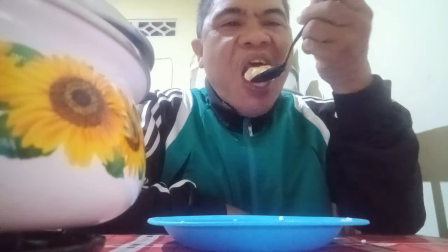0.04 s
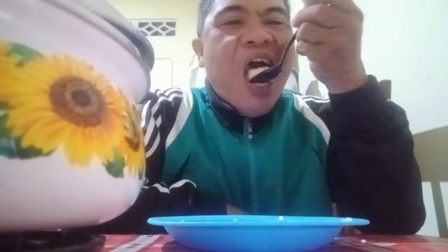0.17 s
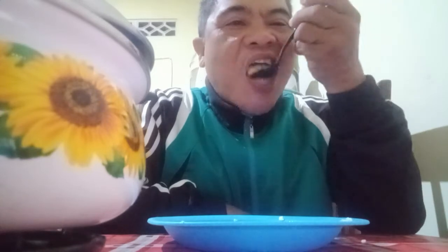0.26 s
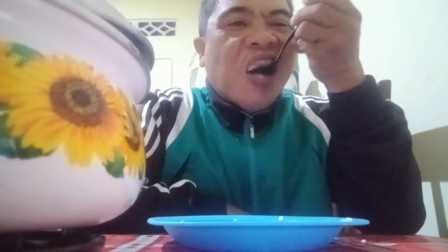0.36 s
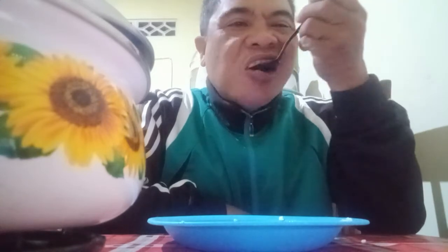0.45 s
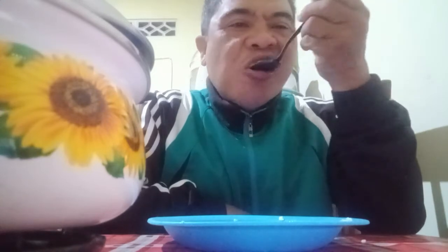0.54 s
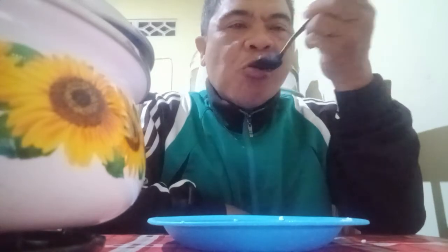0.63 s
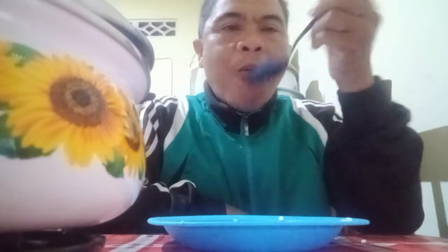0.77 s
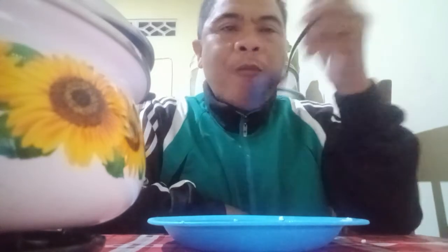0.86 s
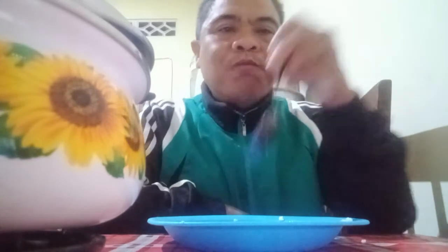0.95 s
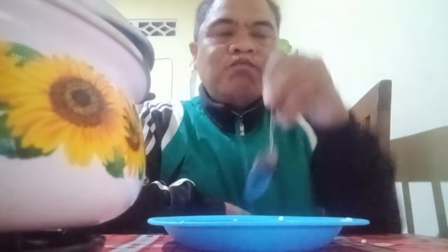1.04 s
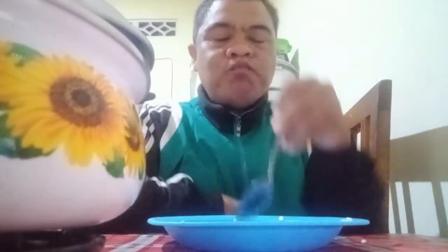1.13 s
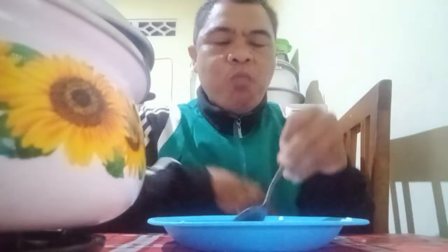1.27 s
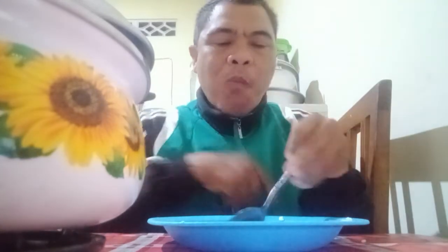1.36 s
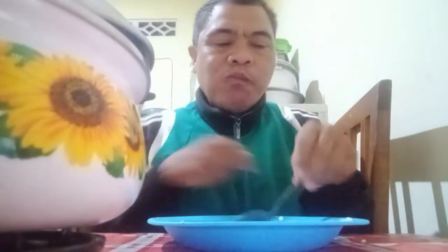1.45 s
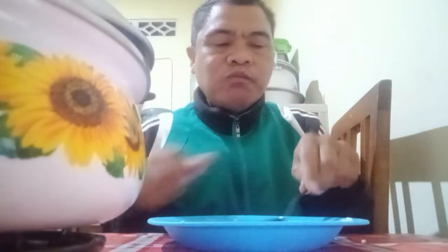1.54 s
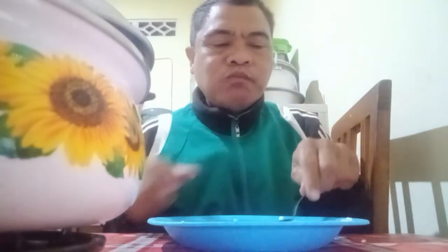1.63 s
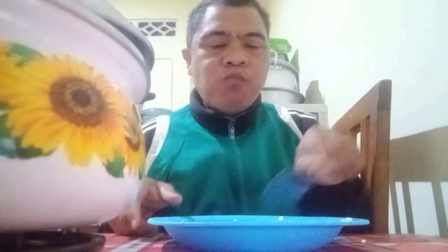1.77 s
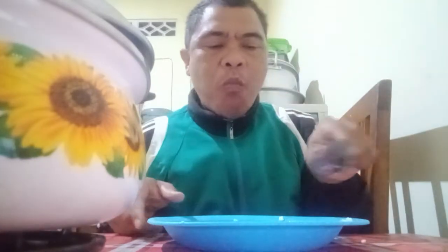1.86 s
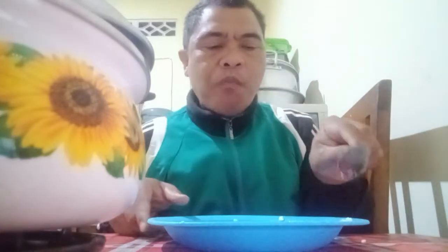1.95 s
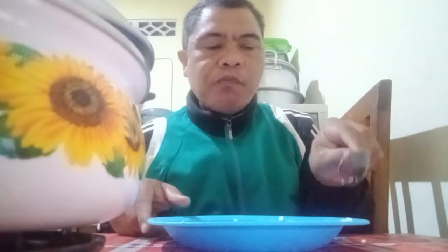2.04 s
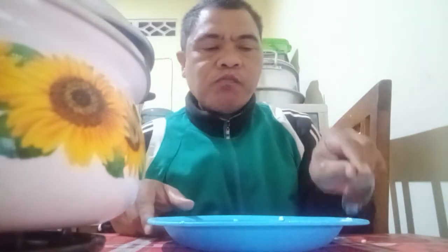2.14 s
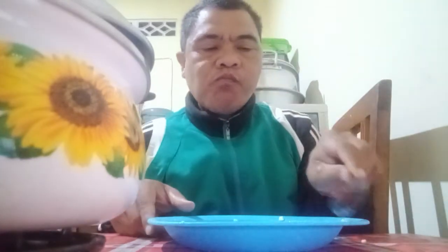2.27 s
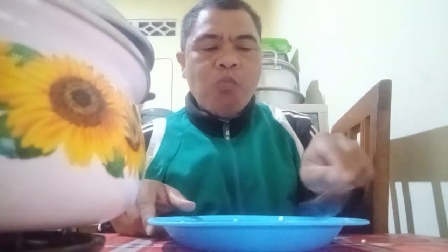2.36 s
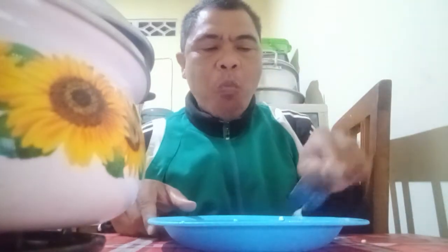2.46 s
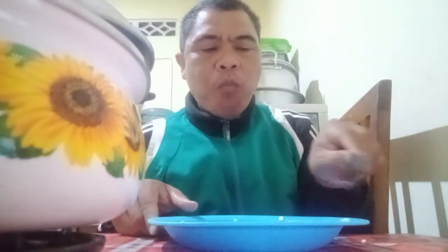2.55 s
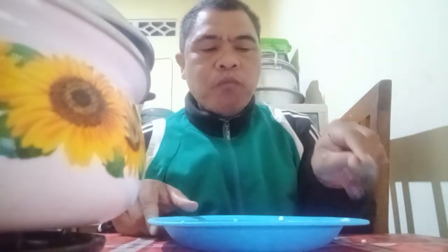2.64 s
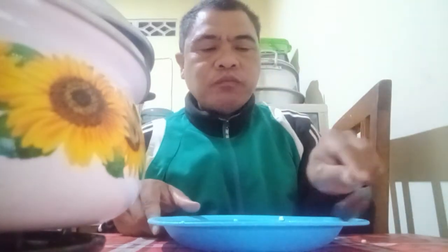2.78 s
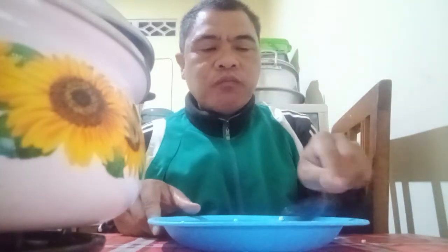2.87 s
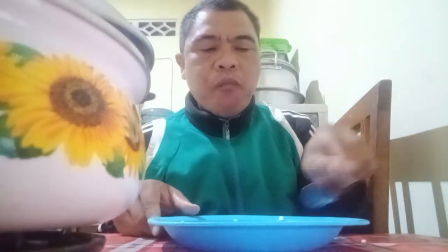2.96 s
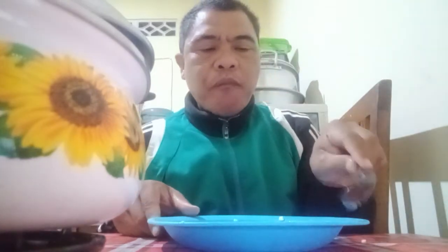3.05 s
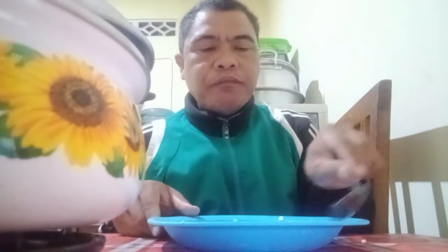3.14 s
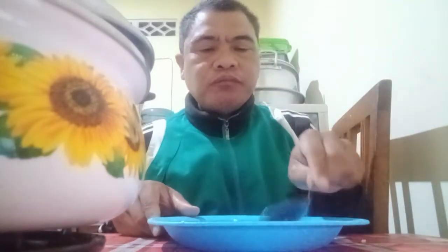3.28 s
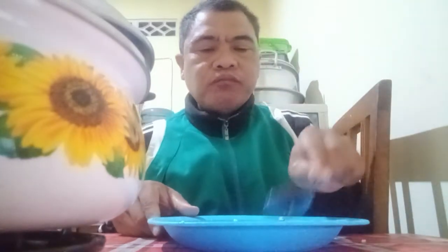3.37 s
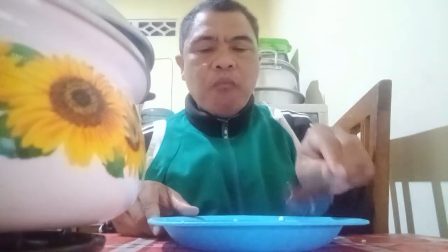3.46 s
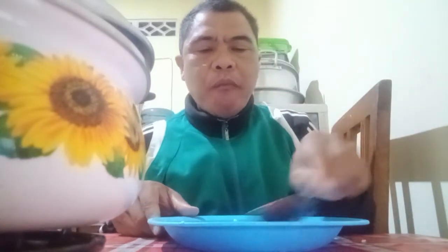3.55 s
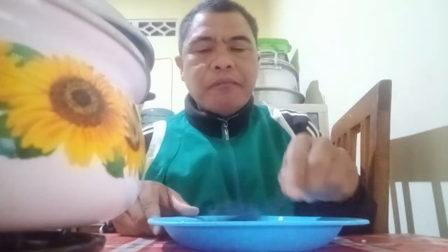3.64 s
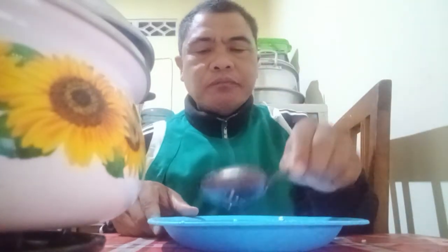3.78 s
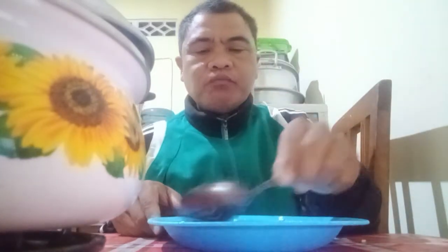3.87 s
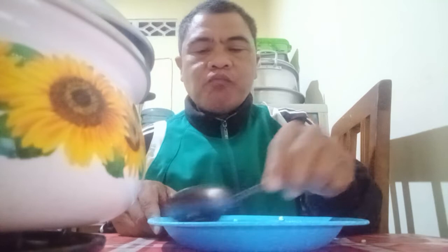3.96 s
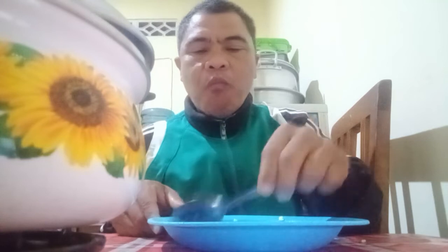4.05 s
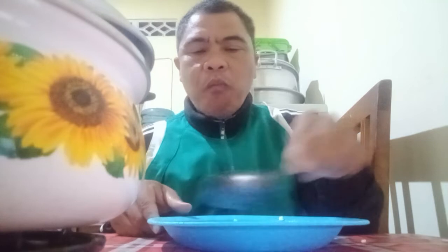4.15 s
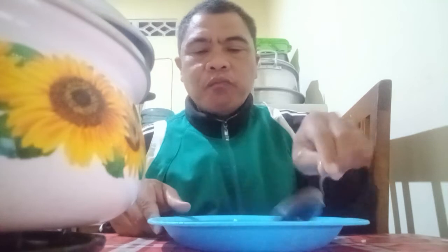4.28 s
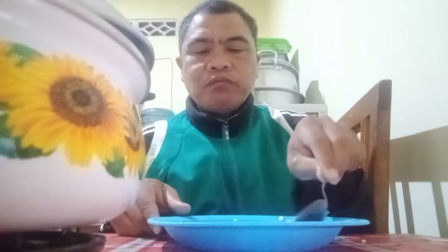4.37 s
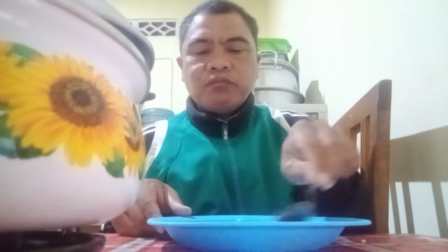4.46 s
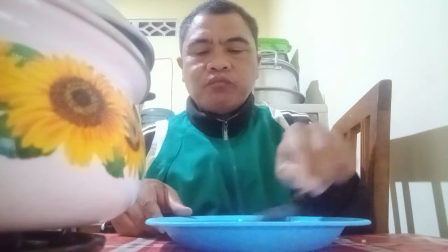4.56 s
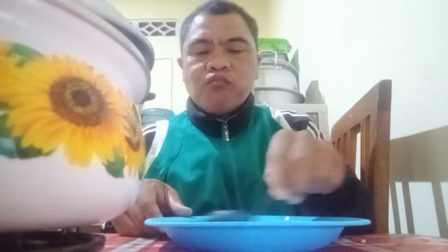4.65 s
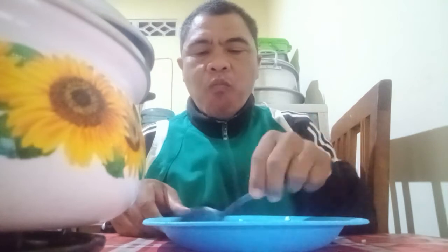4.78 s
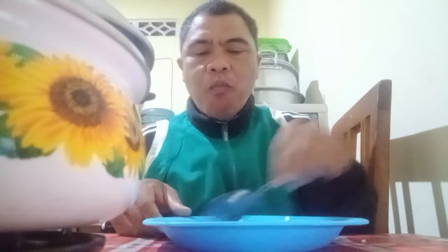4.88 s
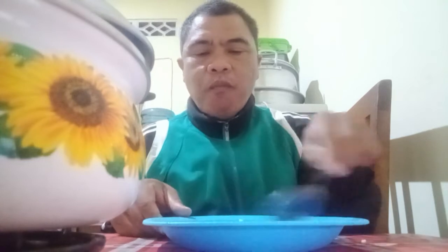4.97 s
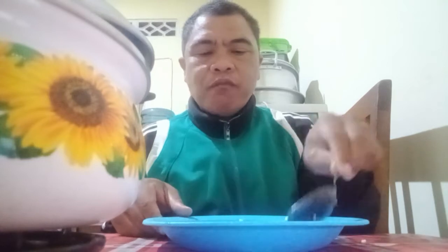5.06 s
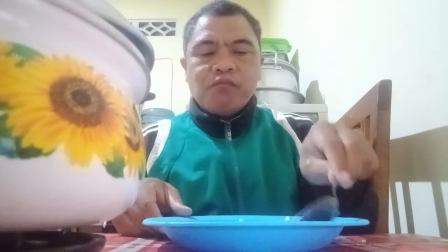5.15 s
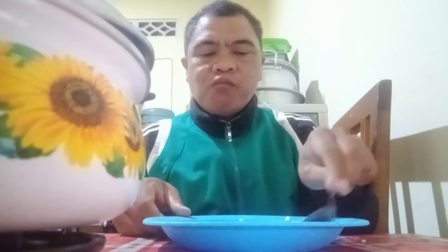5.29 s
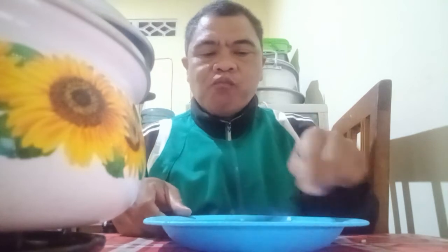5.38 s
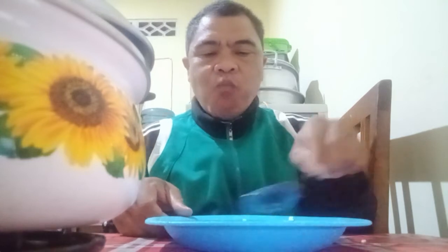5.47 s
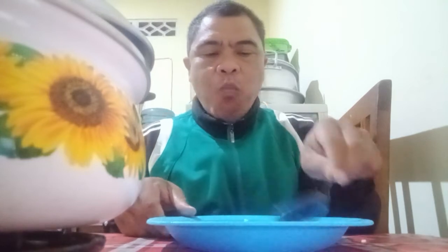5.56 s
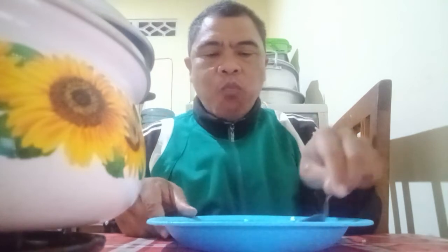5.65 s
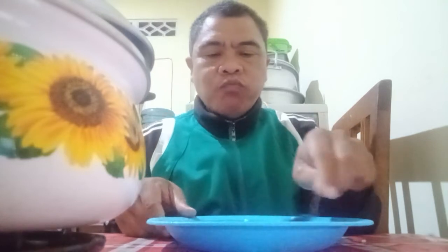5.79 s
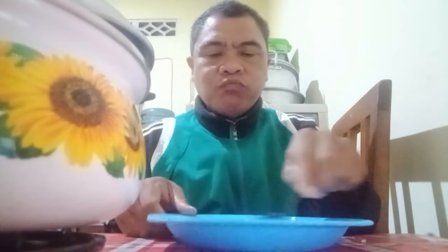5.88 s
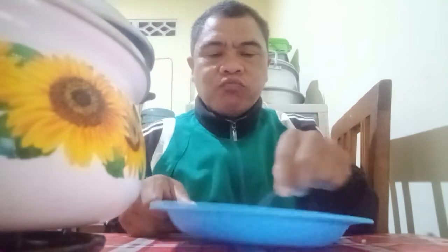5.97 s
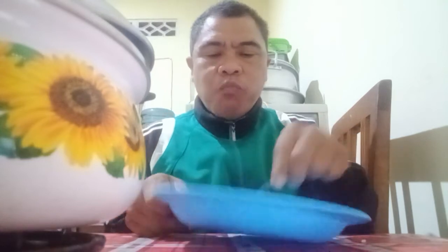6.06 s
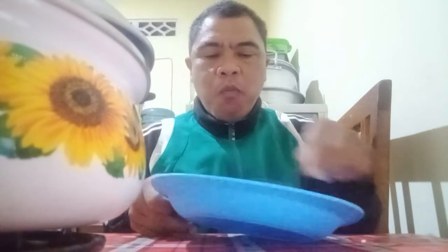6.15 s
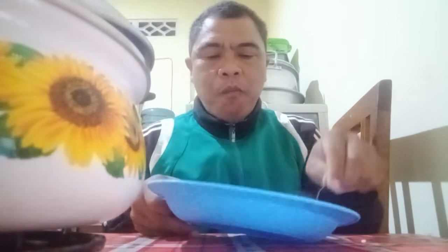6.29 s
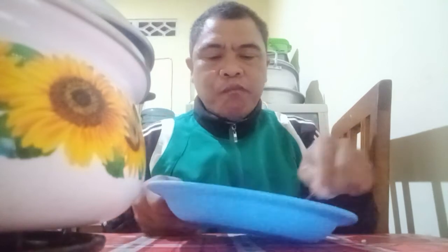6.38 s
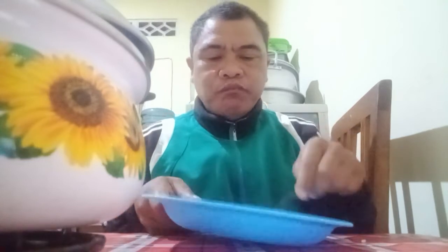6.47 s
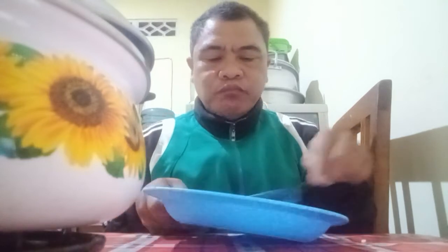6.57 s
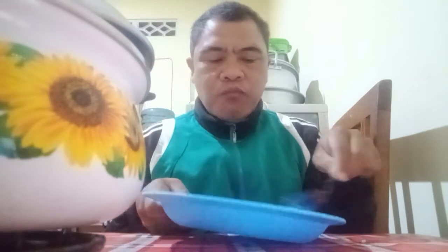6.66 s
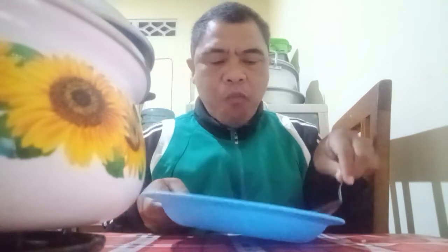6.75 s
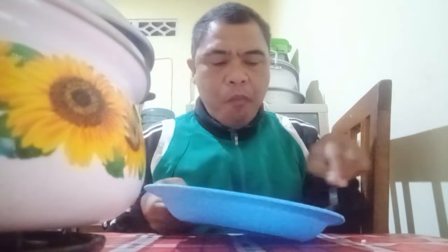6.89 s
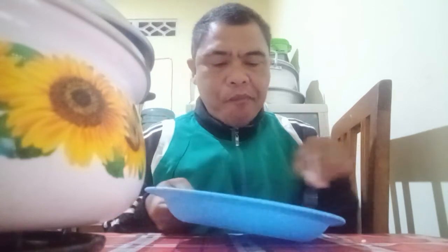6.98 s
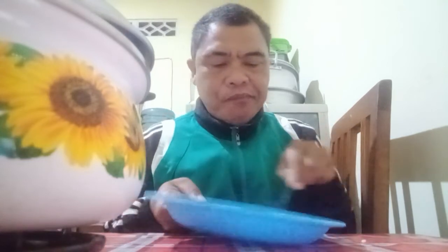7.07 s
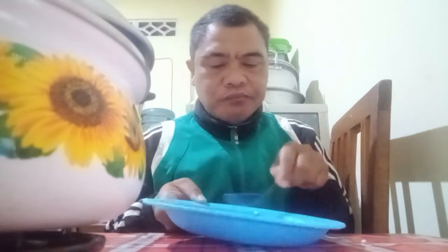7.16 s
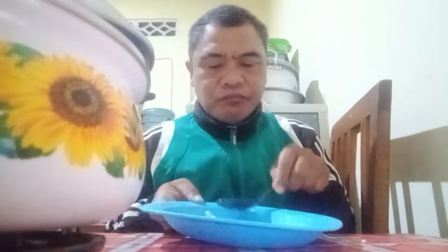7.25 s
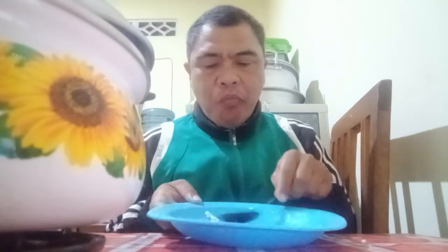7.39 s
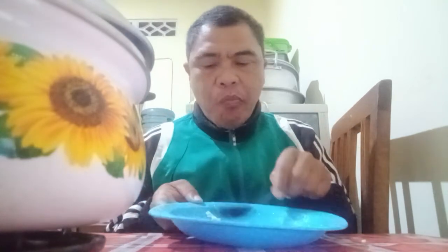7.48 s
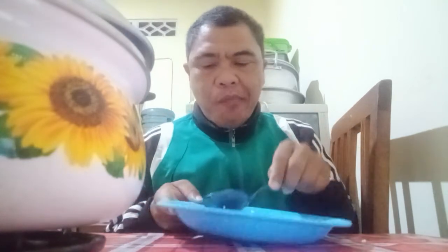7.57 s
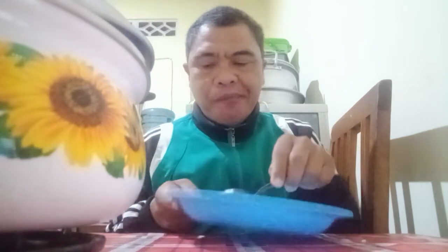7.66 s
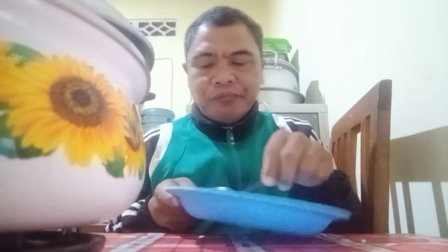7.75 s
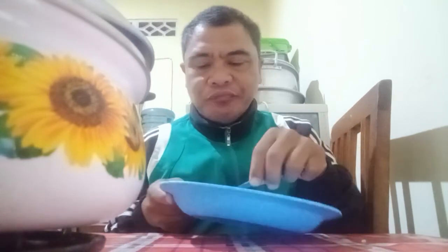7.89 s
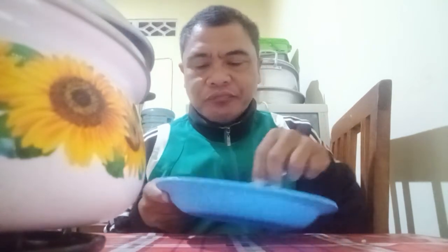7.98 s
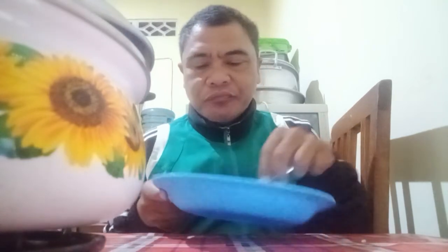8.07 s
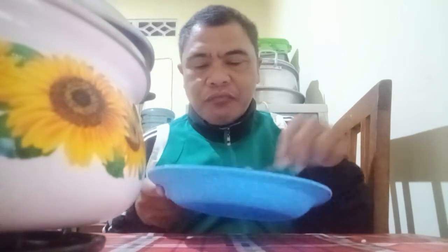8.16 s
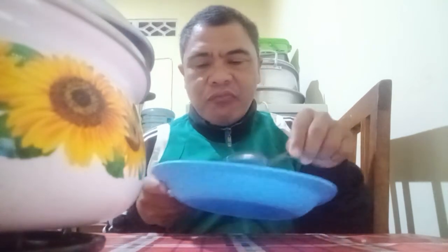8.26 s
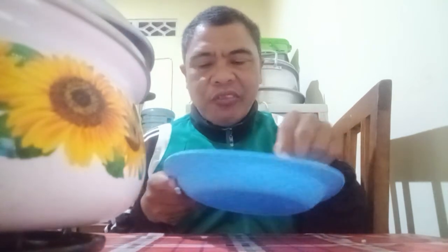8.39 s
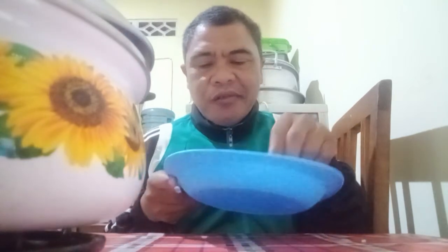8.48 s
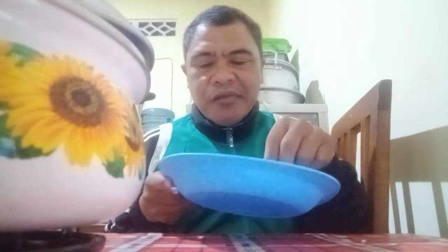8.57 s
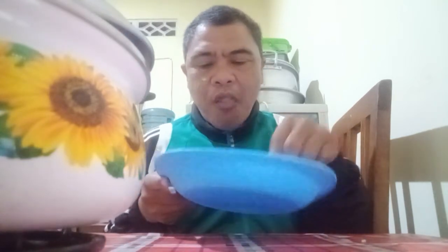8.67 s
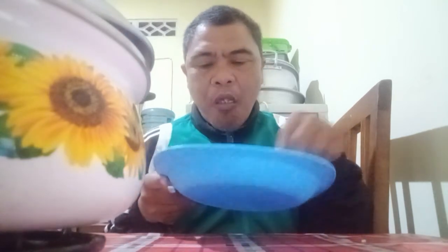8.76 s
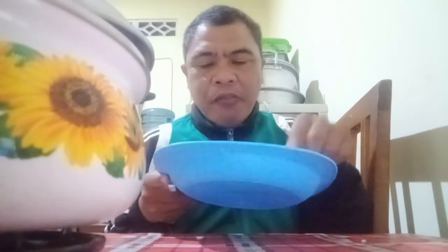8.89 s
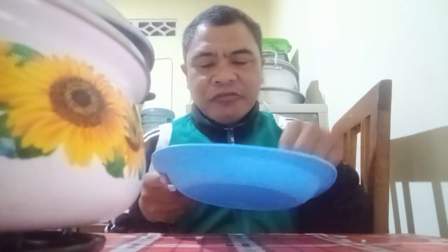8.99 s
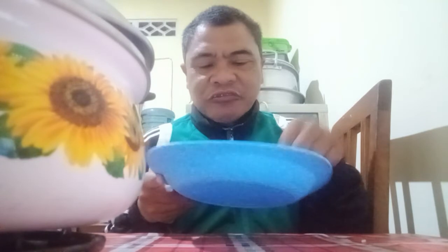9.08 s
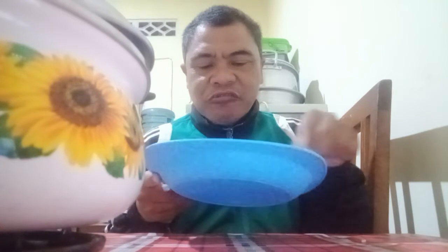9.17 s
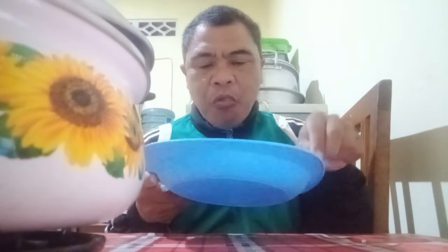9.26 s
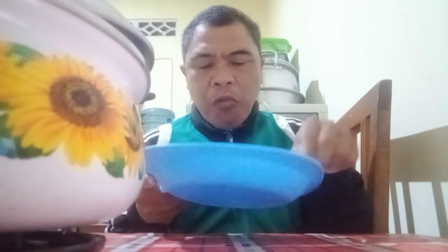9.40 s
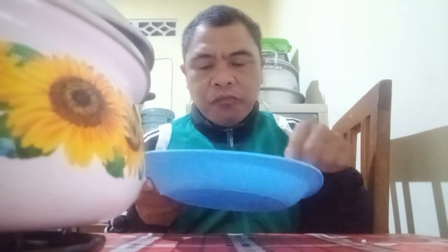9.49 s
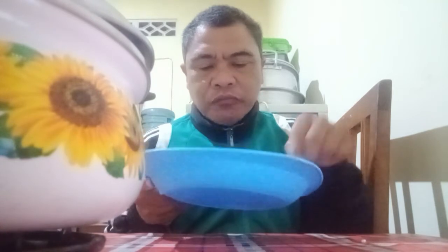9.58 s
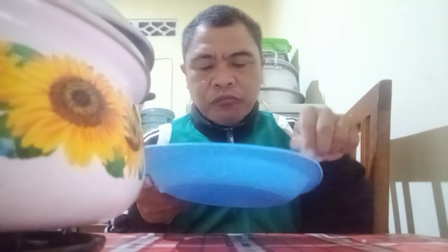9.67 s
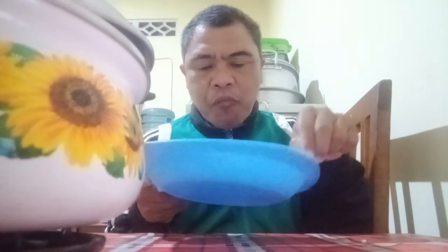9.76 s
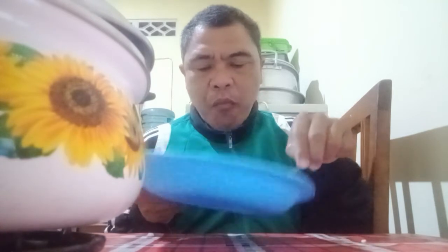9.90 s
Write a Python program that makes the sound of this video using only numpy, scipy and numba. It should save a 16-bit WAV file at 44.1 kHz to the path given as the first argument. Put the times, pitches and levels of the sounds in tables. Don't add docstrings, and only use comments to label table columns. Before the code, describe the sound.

Close by in a small hard-walled room, a metal spoon ticks faintly against teeth, then there is a near-quiet pause with soft bumps. Light taps on a plastic plate follow, growing into short, hollow, gritty scrapes with sharp clacks. The strokes continue in clusters, lower pitched once the plate is lifted, and end softer. Low room hum and thin hiss stay underneath, caught by a phone about an arm's length away.

```python
import sys
import numpy as np
from scipy import signal
from scipy.fft import rfft, irfft
from scipy.io import wavfile
from scipy.ndimage import uniform_filter1d
from numba import njit

SR = 44100
rng = np.random.default_rng(int(sys.argv[2]) if len(sys.argv) > 2 else 0)


def transcribe(u):
    v = np.clip(np.atleast_2d(u).T, -1, 1)
    q = np.round(v * 32767).astype(np.int16)
    wavfile.write(sys.argv[1], SR, q)


def convert_level_to_amplitude(level_db):
    exponent = np.asarray(level_db, float) / 20
    return 10 ** exponent


N = 437913
HOP = 128

# hardest moment in seconds, swell in seconds, let-off in
# seconds, bowl level in dB.
PUSHES = [(1.229, 0.012, 0.12, -36.5), (1.275, 0.1, 0.097, -36.5), (2.814, 0.088, 0.033, -33),
          (3.197, 0.034, 0.044, -28), (3.502, 0.017, 0.14, -36), (3.586, 0.068, 0.16, -28.5),
          (3.908, 0.0046, 0.34, -32.5), (3.969, 0.068, 0.046, -18), (4.001, 0.15, 0.19, -27.5),
          (4.553, 0.11, 0.18, -33), (4.648, 0.17, 0.34, -21.5), (4.77, 0.27, 0.18, -20),
          (4.85, 0.041, 0.19, -32.5), (5.307, 0.0065, 0.1, -31.5), (5.354, 0.064, 0.18, -22),
          (5.679, 0.0088, 0.042, -31), (5.962, 0.098, 0.11, -19), (6.033, 0.21, 0.16, -22),
          (6.38, 0.0093, 0.25, -26), (6.45, 0.064, 0.08, -23.5), (6.901, 0.061, 0.4, -35.5),
                 (6.968, 0.085, 0.17, -27), (7.255, 0.044, 0.34, -32), (7.379, 0.26, 0.076, -30.5),
                 (7.679, 0.018, 0.24, -25.5), (7.82, 0.06, 0.32, -25), (7.966, 0.3, 0.17, -19.5),
                 (8.432, 0.024, 0.2, -42), (8.596, 0.11, 0.1, -20.5), (8.896, 0.0049, 0.27, -39.5),
                 (8.977, 0.049, 0.089, -32), (9.309, 0.014, 0.18, -38.5), (9.371, 0.053, 0.21, -26),
                 (9.449, 0.13, 0.093, -23), (9.763, 0.0036, 0.064, -47), (9.837, 0.11, 0.18, -30),
                 (9.92, 0.018, 0.062, -34.5)]
# favoured ring in Hz, then boom, rim and edge hiss in
# dB relative to the bowl.
PLACES = [(1760, -13, 2, -9), (1208, -29, -22, -8), (1820, -8.5, -16.5, -13.5),
          (1800, -21, -12.5, -16.5), (1820, -18, -2.5, -10.5), (1800, -23, -2, -8),
          (1880, -23, -10, -6.5), (1344, -41, -13, -21), (1540, -20.5, 1.5, -3.5),
          (1800, -15, -30, -4), (1070, -25, -6.5, -3.5), (1663, -12, -8.5, -6), (1720, -54, -6.5, -35),
          (1770, -24, -35, -19), (1530, -23.5, -3.5, -7), (1800, -19, -4, -12),
          (1320, -32, -16.5, -22.5), (1100, -27.5, -14, -20),
          (1133, -13, -9.5, -18), (1130, -16, -5, -10), (1910, -20, -9, -16.5),
                 (1120, -16.5, -6, -11.5), (900, -6.5, -10, -17), (940, -36, -11.5, -10.5),
                 (1020, -22, -15, -14), (1050, -11.5, -11, -8), (1085, -22.5, -12.5, -10.5),
                 (980, -9, -18, -16), (983, -17, -13.5, -14), (1920, 2.5, -17, -23),
                 (1135, -1.5, -8, -16.5), (1000, -10, -21, -7.5), (1075, -4.5, -13.5, -24),
                 (1342, -20, -13, -14.5), (1680, -1, -3.5, -4), (1020, -11, -17.5, -22),
                 (1020, -32, -30, -16)]
SWELL_DB, ROUNDNESS = 31.5, 1.59
BOOM_SHARP, RIM_SHARP, HISS_SHARP = 1.62, 1.62, 1.49

# time in seconds, step in dB, felt for seconds.
CATCHES = [(3.197, 0, 0.018), (3.579, 1.5, 0.014), (3.604, -9.5, 0.047), (3.99, 7, 0.01),
           (4.022, -12.5, 0.057), (4.531, 5.5, 0.036), (4.6, 8, 0.0074), (4.823, -7, 0.11),
           (5.345, 3.5, 0.013), (5.371, -7.5, 0.047), (5.94, -0.5, .02), (6.048, -8, 0.046),
           (6.866, -4, .02), (7.058, -10.5, 0.15), (7.244, 5, .03), (7.803, 7, 0.0096), (7.921, 7, 0.02),
           (8.039, -8, 0.016), (8.082, -15, 0.034), (8.428, -9, 0.022), (8.941, 16, 0.063),
           (9.356, -7, 0.019), (9.815, 2, 0.02), (9.885, 20.5, 0.0071)]
# time in seconds, gain in dB.
SNAGS = [(3.547, 7), (3.568, 4), (3.583, -7), (3.941, 0), (3.973, -1), (4.013, -17), (4.089, 14.5),
         (4.512, -4), (4.531, 8), (4.569, 6), (4.599, 2), (4.74, -15), (4.766, -14), (4.811, 4),
         (4.867, 11.5), (4.905, 1), (5.33, 6), (5.914, -4), (5.957, 0), (6.01, 12), (6.04, -10),
         (6.422, 10), (6.895, 5), (6.929, 18.5), (6.94, 2), (6.97, 0), (7.025, 4), (7.226, 3), (7.29, -3),
         (7.324, 4), (7.362, 2), (7.697, 4), (7.705, -9), (7.736, 7), (7.831, -3), (7.9, -3), (7.96, 1),
         (7.988, 0), (8.005, 11), (8.049, 12), (8.515, 0), (8.524, 11), (8.542, 6), (8.568, 3),
         (8.964, 2.5), (9.355, 5), (9.381, -9), (9.435, -5), (9.449, -5), (9.465, 4), (9.513, 1),
         (9.815, 12.5), (9.885, 4.5), (9.917, 10)]
SNAG_S, SNAG_SHARE = 0.0022, (1, 0.6, 0.35, 0.13)
# time in seconds, bowl peak in dB, rim in dB, edge in dB.
TAPS = [(1.226, -19, 5, 14.5), (2.734, -18, -16, -18), (3.177, -8.5, -14, -11), (3.196, -8, -8, -18),
        (3.5, -2, 6.5, -6), (3.907, -4.5, 2, -1.5), (3.992, -14, -21, -14), (4.389, -22, 13.5, 5.5),
        (5.679, -12.5, -9, 2.5), (6.38, -8.5, -9, -7.5), (6.825, -25.5, -2, -7), (6.866, -32, -14, -10),
        (7.248, -15.5, 22, 8.5), (7.676, 2, 0, -8), (7.802, -7, -6, -11), (7.924, -4, 6, 0),
        (8.428, -22, -12, -14), (8.893, -25, -9, -9), (9.306, -22, 11, 6.5), (9.761, -23, -2, -8)]
CHATTER_S = 0.0008

# time in seconds, finest scratch in dB and
# steel ring in dB (both relative to the edge hiss), favoured rim ring in Hz.
GRIPS = [(0, -13, -16, 2680), (2.5, -8, -13, 2310), (3.0, -9, -12, 2270), (3.4, -10.5, -10.5, 3150),
         (3.8, -9.5, -11.5, 2830), (4.3, -28, -31, 3330), (4.45, -17, -25, 3150), (4.7, -19, -24, 2960),
         (5.2, -13, -8.5, 3560), (5.6, -22, -12, 2590), (5.8, -24, -12, 2480), (6.3, -12, -11, 3050),
         (6.75, -10, -16, 3640), (7.2, -9.5, -14, 3420), (7.6, -14, -15, 3240), (7.78, -19.5, -19, 3350),
         (8.35, -21, -18, 3240), (8.85, -22, -12, 3080), (9.25, -15, -14, 3450), (9.7, -12.5, -18, 2820)]
# boom in Hz, edge in Hz, steel in Hz, second ring in Hz.
FREE = [(840, 5600, 12700, 2960), (890, 5100, 11350, 3000), (875, 5300, 11350, 3240),
        (814, 5200, 11500, 2100), (820, 5400, 13000, 3520), (590, 6200, 12000, 1460),
        (590, 6900, 13000, 3840), (590, 5480, 13300, 3950), (614, 5570, 11000, 2900),
        (600, 5570, 11350, 3240), (580, 5500, 11350, 2920), (624, 5300, 10700, 2320),
        (462, 5320, 11350, 2240), (770, 5600, 11350, 2700), (640, 5100, 12500, 2250),
        (650, 5500, 12000, 3810), (632, 5800, 11350, 2300), (517, 6100, 11350, 2300),
        (576, 4820, 11350, 2530), (600, 5300, 11350, 3240)]
FREE_DB, FREE_SPREAD = (25, 12.3, 11.4, 7.6), (0.12, 0.064, 0.054, 0.072)
SECOND_DB, SECOND_SPREAD = 10, 0.063
FAVOUR_DB, FAVOUR_SPREAD = 21.5, 0.092

# pitch in Hz, width in Hz, level in dB.
PLATE = [(390, 38, -0.5), (472, 50, -8), (586.5, 22, 7.5), (645.6, 22, 3), (760, 42, 1), (864, 34, -9),
         (925, 37, -5), (977, 32, -0.5), (1038.3, 26, 1.5), (1091, 45, 4), (1166, 40, -13), (1245, 38, 4.5),
         (1328, 85, 6.5), (1370, 11, -6), (1447, 14, 5.5), (1450, 480, 11), (1614.5, 29, 5.5),
         (1736, 105, 13), (1840, 22, -9), (1890, 34, 3), (1987, 20, -1), (2070, 19, -23.5), (2150, 40, -26),
         (2173, 38, -1.5), (2500, 38, -10), (2723, 78, 3), (2820, 60, -2), (3119, 54, 5), (3220, 87, 10),
         (3340, 92, 2), (3390, 74, -2), (3560, 47, -11), (3692, 67, 1.5), (3694, 87, -15), (3900, 52, -13),
         (3980, 63, -12), (4510, 80, -2), (4820, 130, -5), (5070, 71, 8), (5315, 170, 2), (5377, 120, 3),
         (5746, 150, 7), (6240, 190, 8), (6570, 66, -0.5), (6890, 570, 5.5), (7170, 1800, -1),
         (7630, 150, -7.5)]
EDGES_HZ = [350, 900, 2300, 4300, 10300]
# pitch in Hz, level in dB per Hz.
RASP = [(190, -92), (320, -74), (567, -9), (787, -21.5), (1060, -18.5), (1310, 28.5), (1760, 6),
        (1940, -11.5), (2870, 5), (3160, -0.5), (3950, -31), (4280, -33), (4550, -18), (5260, 5.5),
        (9630, -22), (12300, -32), (16000, -19)]
# pitch in Hz, level in dB per Hz.
SHEEN = [(10000, 1.5), (11400, -5), (12400, -8.5), (13600, -18), (14500, -25), (15200, -5), (16000, -21)]
# pitch in Hz, width in Hz, level in dB.
SPOON = [(6700, 57, -16), (8170, 100, -29), (9030, 57, -7)]
SPOON_TIP = [(11230, 69, 6.5), (11700, 110, 1), (13200, 200, 2), (14900, 300, -5)]
TIP_DB = -6
HANDLE = [(2850, 6.5, 2), (3150, 50, 1), (3780, 16, 6.5), (5400, 60, -2), (6500, 83, 6), (8100, 260, 12)]
# time in seconds, peak in dB, low ring in dB, low ring in Hz.
TEETH = [
    (0.241, -34, -12.5, 2850),
    (0.3493, -43, -10, 3150),
    (0.536, -41, -35, 3150),
    (0.552, -39.5, -16.5, 2840),
]

# middle in seconds, level in dB, length in seconds.
THUDS = [(.84, -65, .03), (.995, -52, 0.023), (1.34, -57.5, 0.034), (1.78, -63, 0.036), (2.33, -61, 0.11),
         (3.57, -59, 0.048), (4.04, -74.5, 0.077), (4.62, -58, 0.049), (5.502, -62, 0.14),
         (5.81, -59.5, 0.056), (5.97, -63, 0.051), (6.35, -65, 0.24), (7.38, -59, 0.076),
         (7.848, -42.5, 0.029), (8.65, -66, 0.099), (8.91, -62, 0.035)]
TABLE_DB = -68
# middle in seconds, level in dB, pitch in Hz, length in seconds.
BUMPS = [(0.45, -55.5, 890, 0.064), (0.847, -53, 340, 0.019), (0.838, -48.5, 930, 0.027),
         (1.903, -50.5, 630, 0.043), (3.3, -41, 830, 0.021), (6.975, -44.5, 364, 0.041),
         (6.72, -60, 725, .06), (9.72, -59, 1500, 0.027), (5.87, -43, 2380, 0.035), (1.34, -62, 5500, .05),
         (1.11, -61, 5500, .03), (3.24, -44.5, 1040, 0.036), (3.22, -55, 420, .04),
         (4.96, -42.5, 1670, 0.075), (8.2, -53.5, 570, 0.046), (7.843, -49, 250, 0.027),
         (8.543, -50.5, 316, 0.03), (0.99, -62, 11000, 0.027), (1.128, -65, 12000, 0.024),
         (1.405, -68, 11000, .02), (3.82, -67, 10600, 0.048), (6, -58, 10400, 0.025)]

ROOM_T60_S, ROOM_DB = 0.33, -11
# pitch in Hz, level in dB per Hz.
AIR = [(100, -24.5), (170, -3.5), (377, -10.5), (415, -8.5), (508, -11), (598, -4.5), (1160, -7), (1500, 1),
       (1740, -7.5), (2750, -14.5), (4300, 3.5), (5590, -78.5), (9460, -120)]
AIR_DB = -53
# time in seconds, level in dB.
HUM = [(0, 0), (1, -1), (2, 0), (3, -0.5), (5, 0), (6.7, 1), (8.3, -1.5), (9.93, 0.5)]
# pitch in Hz, level in dB per Hz.
HISS = [(3600, -37), (4400, -9.5), (5200, -5.5), (6200, -10), (6450, 3.5), (7200, -2.5), (8000, 3.5),
        (9500, -5), (10600, -8), (10850, -24), (15500, -26.5)]
# time in seconds, level in dB.
RUSTLE = [(0, -60.5), (.9, -59), (1.5, -61.5), (3, -60.5), (6, -59.5), (9.93, -61)]
TOP_HZ = 15550


def stroke_controls():
    t = np.arange(N // HOP + 2) * HOP / SR
    s, swell, let_off, db = np.transpose(PUSHES)[..., None]
    hz, boom, rim, hiss = np.transpose(PLACES)[..., None]
    down = SWELL_DB * (abs(t - s) / np.where(t < s, swell, let_off)) ** ROUNDNESS
    jerk_db = 0
    for at, step, felt in CATCHES:
        jerk_db = jerk_db + step / 2 * np.sign(t - at) * np.exp(-abs(t - at) / felt)
    bands = (boom, BOOM_SHARP), (0, 1), (rim, RIM_SHARP), (hiss, HISS_SHARP)
    power = [convert_level_to_amplitude(np.maximum(db + rel - sharp * down, -120)) ** 2 for rel, sharp in bands]
    levels = [per_sample(convert_level_to_amplitude(jerk_db) * np.sqrt(p.sum(axis=0))) for p in power]
    share = power[1] / power[1].sum(axis=0)

    since, scratch_db, steel_db, rim_hz = np.transpose(GRIPS)
    grip = np.maximum(np.searchsorted(since, t) - 1, 0)
    boom_hz, edge_hz, steel_hz, second_hz = np.transpose(FREE)
    free_hz = np.array([boom_hz, rim_hz, edge_hz, steel_hz, second_hz])[:, grip]
    top, steel = per_sample(convert_level_to_amplitude(scratch_db[grip])), per_sample(convert_level_to_amplitude(steel_db[grip]))
    return levels, hz.T, share, free_hz, top, steel


def forces(levels):
    hits = rng.random(N) < 7000 / SR
    grit = hits * rng.standard_normal(N) * convert_level_to_amplitude(1.6 * rng.exponential(size=N))
    grit = patchy(grit, 2.3, 30, size=3)
    judder_db = 1.1 * walk(200) + 0.3 * walk(40)
    grit = unit(grit * per_sample(convert_level_to_amplitude(judder_db)))
    snag = signal.lfilter([1], [1, -np.exp(-1 / (SNAG_S * SR))], kicks(*np.transpose(SNAGS)))

    s, db, rim_db, edge_db = np.transpose(TAPS)
    blows = kicks(s, db - 36), kicks(s, db + 2.5), kicks(s, db + rim_db - 10.0), kicks(s, db + edge_db + 0.5)
    chatter = rng.standard_normal(400) * np.exp(-np.arange(400) / (CHATTER_S * SR))
    chatter[0] = 7
    chatter = chatter / np.sqrt(np.sum(chatter ** 2))
    out = []
    for level, blow, felt in zip(levels, blows, SNAG_SHARE):
        scrape = grit * level * (1 + felt * snag)
        out.append(scrape + signal.fftconvolve(blow, chatter)[:N])
    return out


def plate(force, favoured_hz, share, free_hz):
    out, modes = 0, np.array(PLATE)
    for push, lo, hi, rasp_db in zip(force, EDGES_HZ, EDGES_HZ[1:], (-5, -18, -16.5, -21)):
        mine = modes[(modes[:, 0] >= lo) & (modes[:, 0] < hi)]
        hz = mine[:, :1]
        near = 10 * np.log10(convert_level_to_amplitude(favour(hz, favoured_hz, FAVOUR_DB, FAVOUR_SPREAD)) ** 2 @ share)
        near = near + sum(favour(hz, *free) for free in zip(free_hz[:3], FREE_DB, FREE_SPREAD))
        near = near + favour(hz, free_hz[-1], SECOND_DB, SECOND_SPREAD)
        tones = body(push, mine, near + 2.4 * walk(20, count=len(mine)))
        band = signal.butter(8, [0.99 * lo, min(1.1 * hi, 9000)], "band", fs=SR, output="sos")
        rasp = signal.fftconvolve(push, response(RASP, lo, hi))[:N]
        out = out + convert_level_to_amplitude(-2.0) * signal.sosfilt(band, tones) + convert_level_to_amplitude(rasp_db) * rasp
    return out


def fine_scratch(push):
    sheen = signal.fftconvolve(push, response(SHEEN, EDGES_HZ[-1]))[:N]
    return patchy(sheen, 7.2, 20, size=6)


def spoon(push, modes, free_hz):
    free_db = favour(np.array(modes)[:, :1], free_hz, FREE_DB[3], FREE_SPREAD[3])
    return body(push, modes, free_db + 3 * walk(7, count=len(modes)))


def teeth():
    s, db, low_db, ring_hz = np.transpose(TEETH)
    tick = kicks(s, db)
    fizz_level = signal.lfilter([1], [1, -np.exp(-1 / (0.0088 * SR))], tick + 1e-12)
    fizz = fizz_level * rng.standard_normal(N)
    bright = signal.butter(5, 7400, "high", fs=SR, output="sos")
    crack = signal.sosfilt(bright, 1.3 * tick + convert_level_to_amplitude(-0.5) * fizz)
    latest = np.maximum(np.searchsorted(s, np.arange(1, N // HOP + 3) * HOP / SR) - 1, 0)
    free_db = favour(np.array(HANDLE)[:, :1], ring_hz[latest], 7.4, 0.04)
    low = body(kicks(s, db + low_db), HANDLE, free_db)
    return crack + convert_level_to_amplitude(9.0) * spoon(tick, SPOON + SPOON_TIP, 14000.0) + convert_level_to_amplitude(29.0) * low


def handling():
    t = np.arange(N // HOP + 2) * HOP / SR
    shift = convert_level_to_amplitude(TABLE_DB)
    for s, db, length in THUDS:
        shift = shift + convert_level_to_amplitude(db) * np.exp(-((t - s) / length) ** 2)
    low = signal.butter(2, [62, 172], "band", fs=SR, output="sos")
    out = unit(signal.sosfilt(low, rng.standard_normal(N))) * per_sample(shift)
    for s, db, hz, length in BUMPS:
        t = np.arange(-3 * length, 3 * length, 1 / SR)
        band = signal.butter(2, [0.922 * hz, 1.095 * hz], "band", fs=SR, output="sos")
        noise = unit(signal.sosfilt(band, rng.standard_normal(SR // 2))[-len(t):])
        i = int((s - 3 * length) * SR)
        out[i:i + len(t)] += convert_level_to_amplitude(db) * noise * np.exp(-(t / length) ** 2)
    return out


def room(x):
    t = np.arange(int(0.7 * SR)) / SR
    noise = rng.standard_normal(len(t)) * np.minimum(t / 0.004, 1)
    dull = signal.sosfilt(signal.butter(1, 2500, fs=SR, output="sos"), noise)
    tail = dull * convert_level_to_amplitude(-60 * t / ROOM_T60_S) + (noise - dull) * convert_level_to_amplitude(-60 * t / (0.98 * ROOM_T60_S))
    return convert_level_to_amplitude(ROOM_DB) * signal.fftconvolve(x, tail / np.sqrt(np.sum(tail ** 2)))[:N]


def air():
    hum = signal.fftconvolve(rng.standard_normal(N), response(AIR, 126, 3070))[:N]
    hiss = signal.fftconvolve(rng.standard_normal(N), response(HISS, 3300))[:N]
    hum = convert_level_to_amplitude(AIR_DB) * hum * curve(HUM)
    return patchy(hum, 2.2, 13, size=2) + patchy(hiss * curve(RUSTLE), 3.0, 20, size=2)


def kicks(times, db):
    out = np.zeros(N)
    out[(np.asarray(times) * SR).astype(int)] = convert_level_to_amplitude(db)
    return out


def body(push, modes, touch_db):
    hz, width, db = np.transpose(modes)
    r = np.exp(-np.pi * np.maximum(width, 8) / SR)
    share = convert_level_to_amplitude(db[:, None] + touch_db)
    share = share / np.sqrt(np.sum(share ** 2, axis=0))
    gain = share * np.sqrt(2 * (1 - r * r))[:, None]
    return rings(push, r * np.exp(2j * np.pi * hz / SR), gain, HOP)


@njit
def rings(x, pole, gain, hop):
    out = np.zeros(len(x))
    for m in range(len(pole)):
        z = 0j
        for i in range(len(x)):
            z = z * pole[m] + gain[m, i // hop] * x[i] + 1e-18
            out[i] += z.imag
    return out


def favour(hz, free_hz, db, spread):
    return db * np.exp(-(np.log(free_hz / hz) / spread) ** 2)


def patchy(x, swell_db, rate, size):
    cells = signal.stft(x, nperseg=4 * HOP, noverlap=3 * HOP)[2]
    patch = np.arange(len(cells)) // size
    gain = convert_level_to_amplitude(swell_db * walk(rate, count=len(cells) // size + 1))[patch]
    cells = cells * unit(gain)[:, :cells.shape[1]]
    return signal.istft(cells, nperseg=4 * HOP, noverlap=3 * HOP)[1][:N]


def walk(rate, count=1):
    k = max(int(SR / HOP / rate), 1)
    steps = rng.standard_normal((count, N // HOP // k + 3))
    steps = np.repeat(steps, k, axis=1)[:, :N // HOP + 2]
    return unit(uniform_filter1d(uniform_filter1d(steps, k), k))


def response(points, lo=20, hi=20000, size=2048):
    f = np.maximum(np.arange(size // 2 + 1) * SR / size, 1)
    hz, db = np.transpose(points)
    gain = convert_level_to_amplitude(np.interp(np.log(f), np.log(hz), db))
    gain = gain / np.sqrt((1 + (lo / f) ** 22) * (1 + (f / hi) ** 22))
    cep = irfft(np.log(gain + 1e-7))
    cep[1:size // 2] *= 2
    cep[size // 2 + 1:] = 0
    h = irfft(np.exp(rfft(cep)))
    return h / np.sqrt(np.sum(h ** 2))


def per_sample(slow):
    return np.interp(np.arange(N) / HOP, np.arange(slow.size), slow.ravel())


def curve(table):
    return convert_level_to_amplitude(np.interp(np.arange(N) / SR, *np.transpose(table)))


def unit(x):
    return x / np.sqrt(np.mean(x ** 2))


def scene():
    levels, favoured_hz, share, free_hz, top, steel = stroke_controls()
    force = forces(levels)
    edge = force[3]
    steel_rings = spoon(edge * steel, SPOON, free_hz[3])
    tip_rings = convert_level_to_amplitude(TIP_DB) * spoon(edge * top, SPOON_TIP, free_hz[3])
    near = plate(force, favoured_hz, share, free_hz) + fine_scratch(edge * top)
    near = near + steel_rings + tip_rings + teeth()
    return (near + room(near) + handling() + air())[None]


def top_cut(x):
    return signal.sosfilt(signal.butter(12, 16800, fs=SR, output="sos"), x)


def record(dry):
    x = dry - 0.75 * signal.lfilter(*signal.iirpeak(4330, 11.0, fs=SR), dry)
    x = 0.72 * np.tanh(x / 0.72)
    x = signal.sosfilt(signal.butter(2, 55, "high", fs=SR, output="sos"), x)
    x = signal.sosfilt(signal.ellip(8, 0.2, 60, TOP_HZ, fs=SR, output="sos"), x)
    return top_cut(x)


dry = scene()
out = record(dry)
transcribe(out)
```